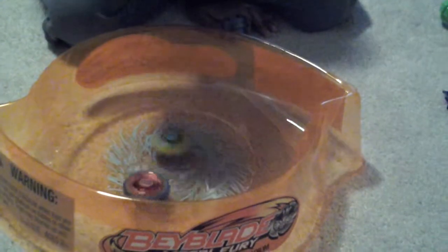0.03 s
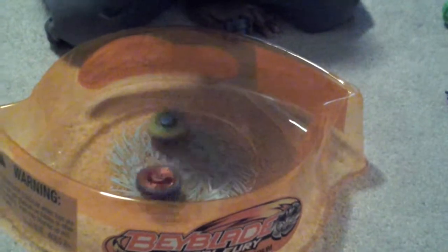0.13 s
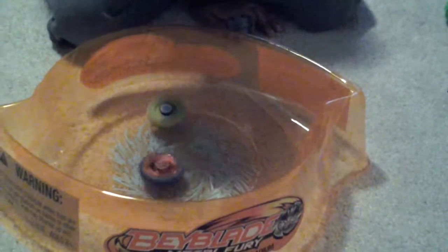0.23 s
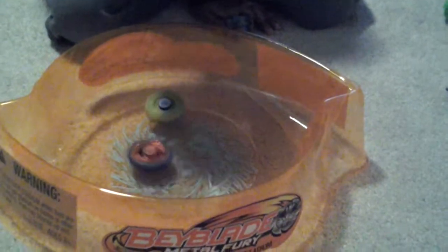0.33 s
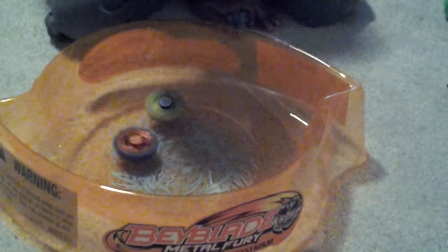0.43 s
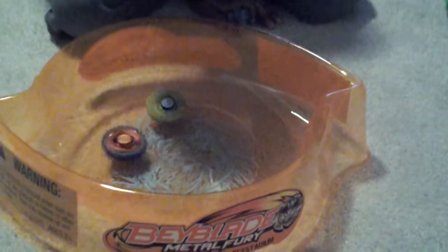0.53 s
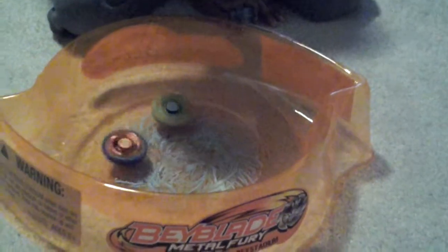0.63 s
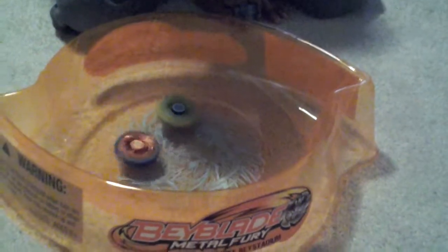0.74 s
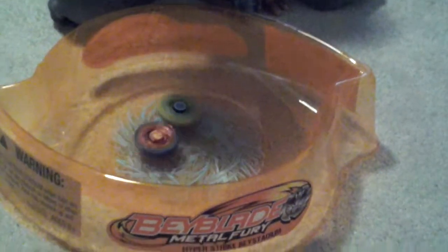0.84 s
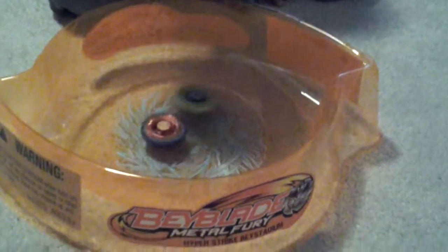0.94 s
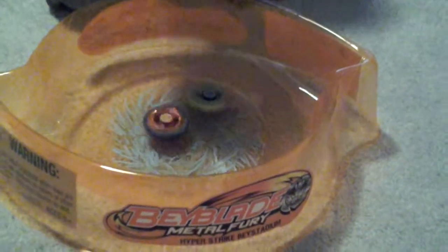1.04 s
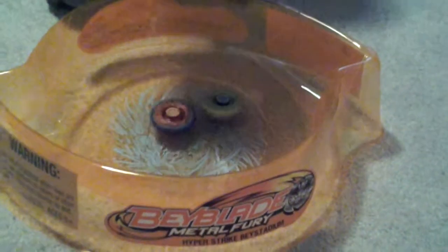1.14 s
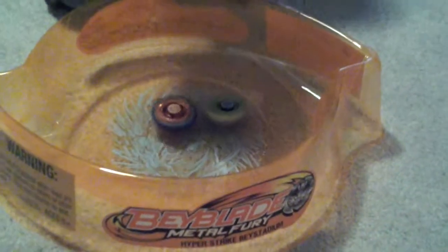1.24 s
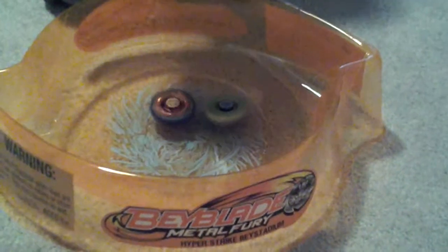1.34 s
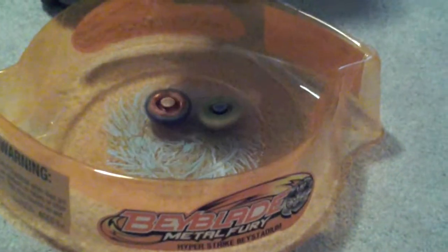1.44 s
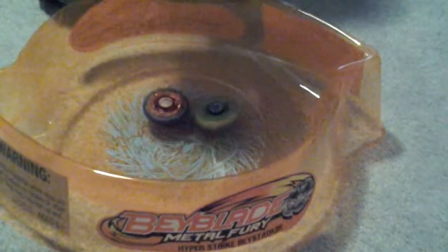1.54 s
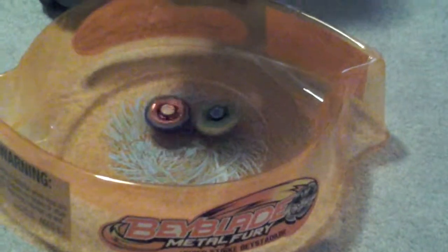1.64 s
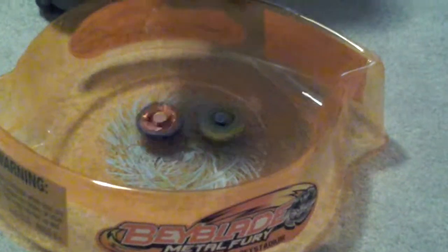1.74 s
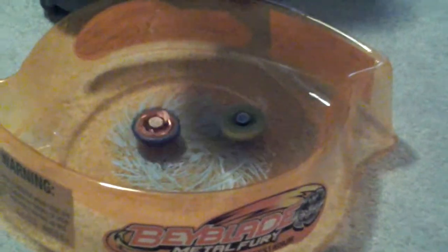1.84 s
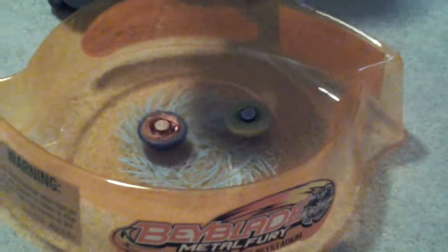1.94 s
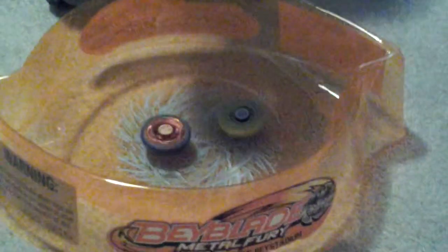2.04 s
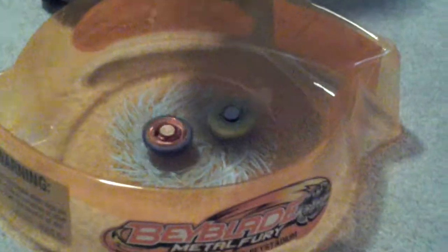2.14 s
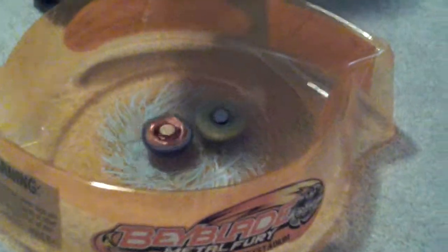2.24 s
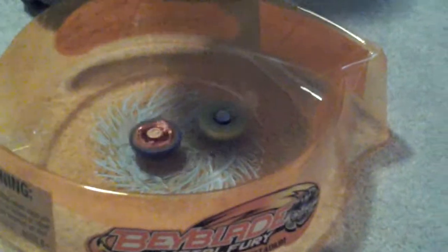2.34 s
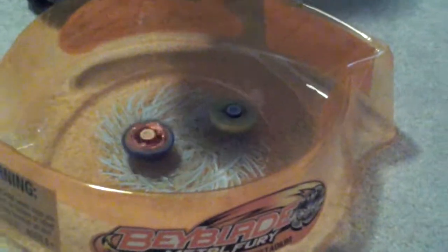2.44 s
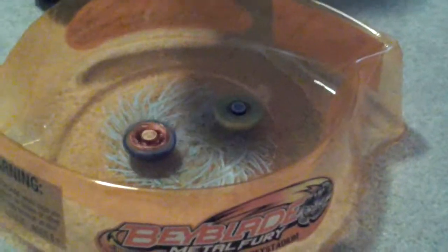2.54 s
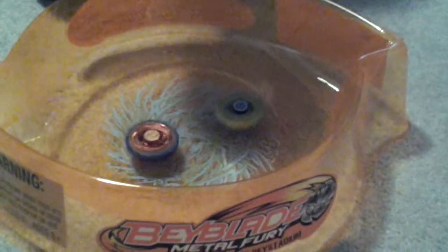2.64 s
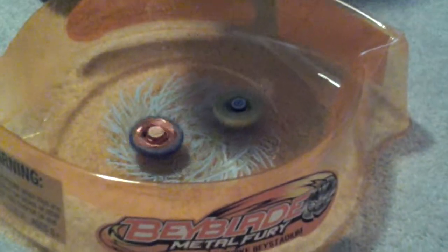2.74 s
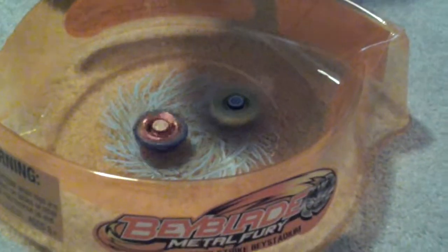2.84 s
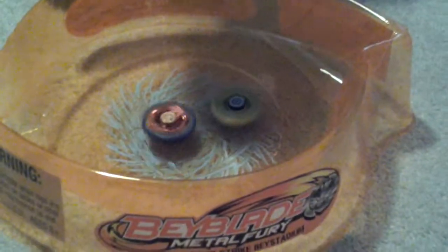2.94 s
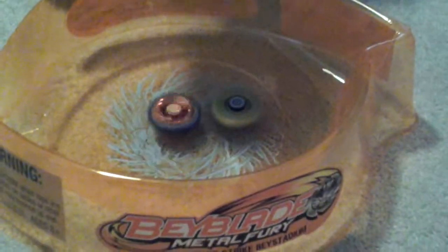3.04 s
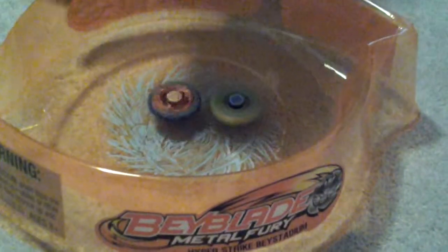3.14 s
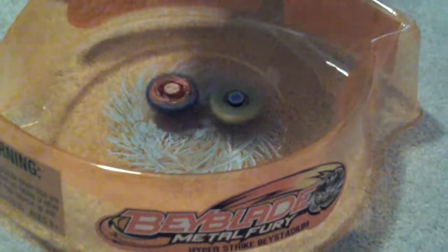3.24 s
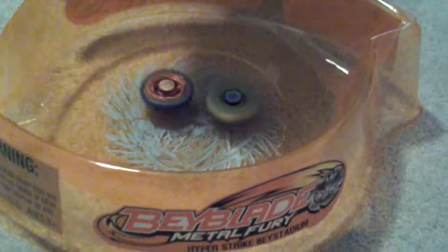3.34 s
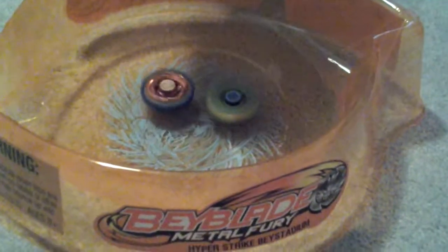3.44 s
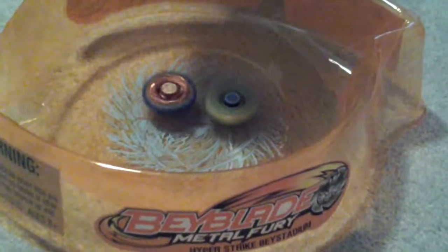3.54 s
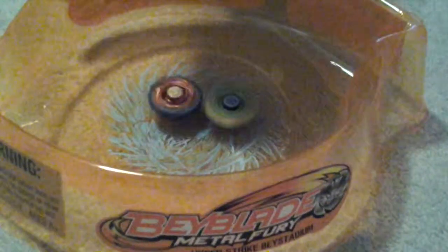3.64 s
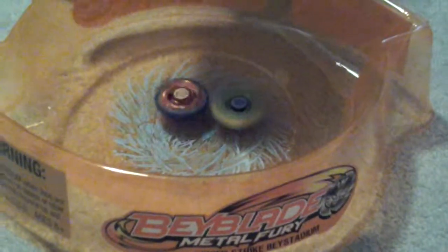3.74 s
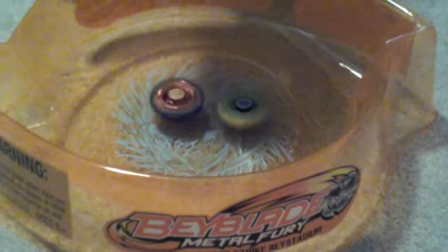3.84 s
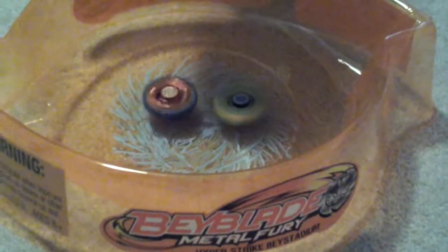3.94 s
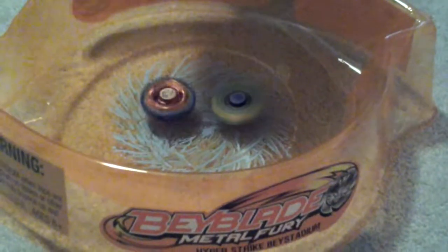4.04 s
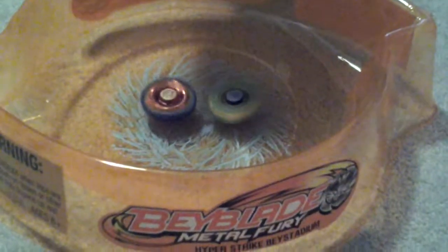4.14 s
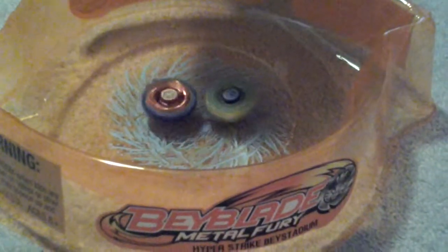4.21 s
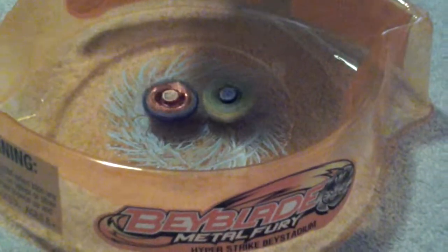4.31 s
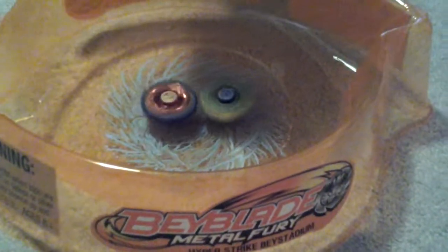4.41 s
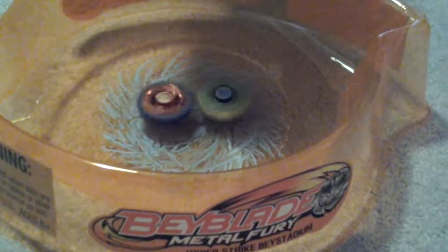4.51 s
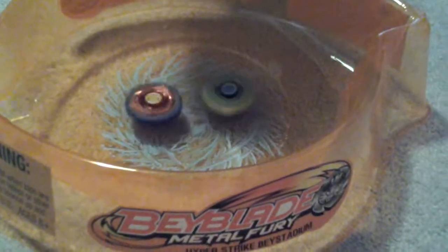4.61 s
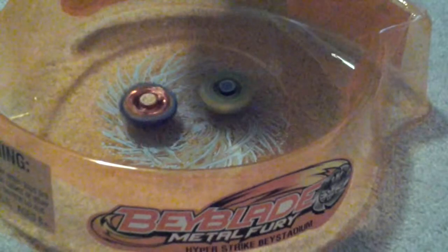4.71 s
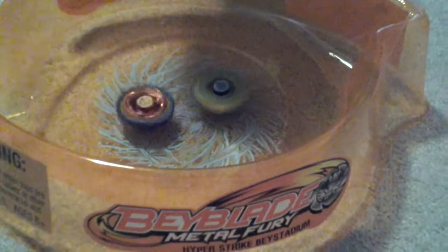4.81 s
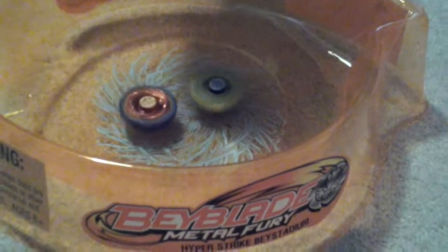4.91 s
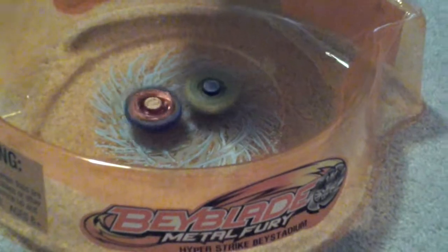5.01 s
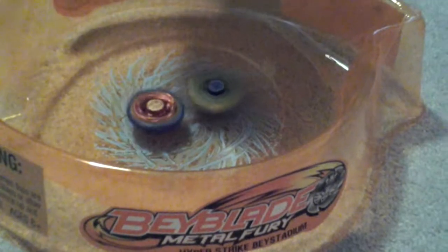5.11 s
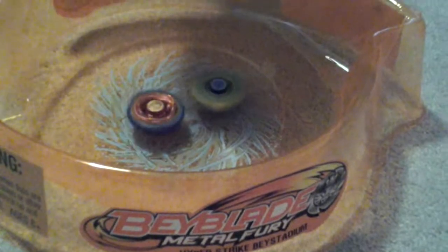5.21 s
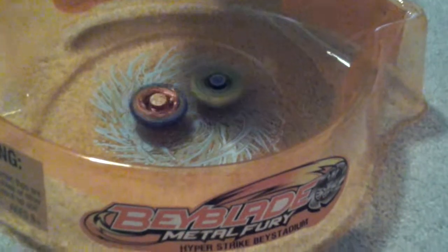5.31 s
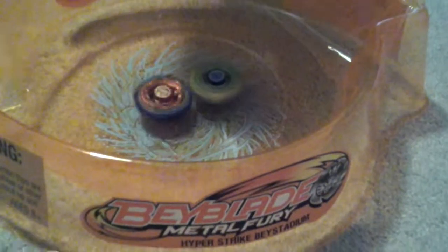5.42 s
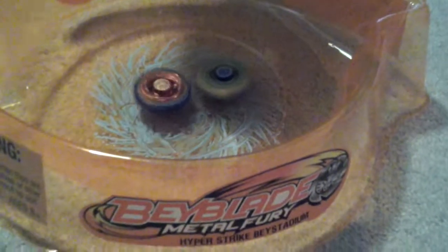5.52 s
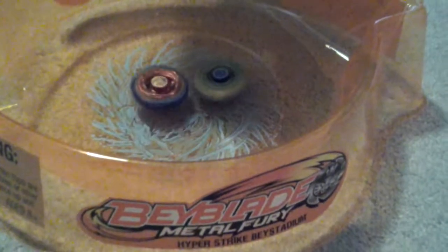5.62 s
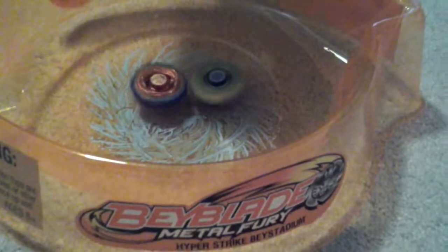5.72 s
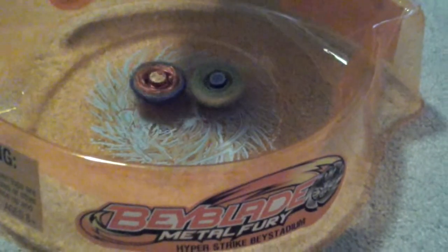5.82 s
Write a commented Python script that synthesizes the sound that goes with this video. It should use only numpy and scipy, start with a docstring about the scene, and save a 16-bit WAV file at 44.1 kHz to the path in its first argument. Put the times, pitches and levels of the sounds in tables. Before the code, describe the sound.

A rapid fluttering metallic scrape slows over a soft rumble and hiss in plastic, broken by sudden loud metal clashes in a small room.

```python
"""Two metal spinning tops circle in a plastic bowl in a small room.
From the start a rocking top scrapes twice a sway, ever slower, in swells of shaped friction noise, while
the tips rumble, grind and hiss as filtered noise over room noise and a faint hum of wavering tones.
From 0.9 s the rims clash now and then: a short noisy clack, then a ring of damped modes, answered by the room.
The loud clashes overload the microphone: its limiter ducks. After 4.96 s the scrapes cease; clashes go on."""
import sys
import numpy as np
from scipy import signal
from scipy.fft import irfft, next_fast_len
from scipy.io import wavfile

SR = 44100
rng = np.random.default_rng(int(sys.argv[2]) if len(sys.argv) > 2 else 0)


def wrap_up_sound(samples):
    """Save the sound to the file named by the first command line argument, as 16-bit audio."""
    columns = np.atleast_2d(samples).T
    # keep every value between -1 and 1, then stretch to whole-number steps
    tamed = np.clip(columns, -1, 1)
    steps = np.round(tamed * 32767).astype(np.int16)
    wavfile.write(sys.argv[1], SR, steps)


N = 258867
TIME = np.arange(N) / SR

# Room noise spectrum: (frequency [Hz], relative level [dB])
AIR_SPECTRUM = [(25, -38.5), (55, -35), (85, -20), (130, -14.5), (230, -2), (500, 0.5), (2000, -4.5),
                (3200, -6.5), (5000, -6), (6500, -16), (9000, -17), (14500, -23)]
# Lines of a faint hum: (frequency [Hz], width [Hz], level at the start [dB], drift [dB/s])
HUM_LINES = [(121, 1.6, -76.5, 0), (173, 5.5, -73.5, 0), (224, 12.3, -65.5, 0), (357.6, 2.5, -53, -0.79),
             (647.6, 6.7, -61.5, .5), (722, 7.8, -62.5, 1), (736.4, 5.4, -55, 0.58),
             (830, 9.2, -55.5, -1.5), (1166, 16.4, -57.5, 0)]
# Reverberation of the room: (frequency [Hz], time to decay by 60 dB [s])
ROOM_DECAY = [(300, 1), (1500, 0.42), (4500, 0.26), (8000, 0.2), (11500, 0.19), (14000, 0.19)]

# Spectra of the bowl's rumble, of its grind and of metal scraping: (frequency [Hz], relative level [dB])
RUMBLE_SPECTRUM = [(50, -49.5), (100, -34), (220, -4), (320, 7), (450, 3), (570, 2), (700, -27), (860, 7),
                   (1000, 0), (1600, -26.5)]
GRIND_SPECTRUM = [(50, -51.5), (150, -38.5), (230, -4), (520, -6), (650, 2.5), (880, 2), (990, -5),
                  (1180, 7.5), (1500, 3.5), (1950, 0), (2700, -7.5), (4000, -38)]
SCRAPE_SPECTRUM = [(80, -50), (1000, -13.5), (2800, -14.5), (3600, -6.5), (4100, 2), (4550, -1),
                   (5050, 3.5), (5600, 0), (6250, 1), (7100, -7), (8600, -12), (10500, -25.5), (14500, -57)]
# Tips running on the bowl, fading as the tops slow:
# (level at the start in full lean [dB], fade [dB/s], dip between swells [dB])
RUMBLE_LEVEL = (-48.5, 2.5, 1.6)
GRIND_LEVEL = (-47, 0.26, 1.3)
HISS_LEVEL = (-45, 5.6, 5.8)

# Rocking top: time of its first sway [s], sway rate at the start [Hz], steady loss to friction [Hz/s]
FIRST_SWAY_S, SWAY_HZ, DRAG_HZ_PER_S = 0.0189, 28.6185, 1.273
SECOND_TOUCH = 0.46  # share of a sway between its two scrapes
# Blows that brake the rocking top: (time [s], sway rate lost [Hz])
BRAKING_BLOWS = [(0.903, 0.887), (1.758, 0.183), (4.553, 0.48)]
# Swells as the top leans over and rights itself, each lasting until the next:
# (start [s], relative level of first scrape [dB], relative level of second scrape [dB])
LEAN_SWELLS = [(-0.15, -33, -35.5), (0.45, -37.5, -36), (0.86, -35, -35), (1.251, -31, -39),
               (1.5, -36, -34), (1.8, -32.5, -36.5), (2.17, -32.5, -40), (2.4, -31.5, -36.5),
               (2.749, -31.5, -39), (3.19, -34.5, -36.5), (3.62, -39.5, -36.5), (3.99, -40.5, -38.5),
               (4.56, -40, -40)]
UPRIGHT_S = 4.958  # the last swell ends and the scrapes cease
SWELL_SKEW, SWELL_FLATNESS = 0.77, 0.87  # shape of the arch that every swell follows
FIRST_DIP_DB, SECOND_DIP_DB = 16, 4  # how far each scrape sinks between swells

# Blows of rim on rim: (time [s], relative force [dB], contact time [s], pitch of the struck spot [Hz],
# treble [dB], body knock [Hz], relative knock level [dB], relative ring level [dB], relative room level [dB])
RIM_BLOWS = [ (0.904, -14.5, 0.0014, 4310, -8, 1660, -10, -16, -6),
             (0.9064, -6, 0.0011, 7200, 1, 1700, -23, -18, -0.5),
             (1.7577, 2, 0.0006, 6120, 1, 1800, -17, 1, -1),
             (2.3392, -1.5, 0.003, 4712, 1.5, 1560, -21.5, -3.5, 0),
             (3.7373, -10.5, 0.0018, 3920, -4.5, 1260, -34, -18, -5.5),
             (3.7784, -7, 0.0023, 4100, 1.5, 2290, -28, -29, 1.5),
             (4.3265, -12, 0.0035, 6010, -3.5, 2580, -15.5, -6.5, -3),
             (4.4900, -31, 0.0016, 4200, 0, 2100, -20, -11.5, 2),
             (4.4986, -5, 0.00059, 4500, -7.5, 2170, -28, -11, -5),
             (4.5536, -0.5, 0.00063, 5303, 2.5, 3435, -7.5, -17.5, -4.5),
             (5.111, -6.5, 0.00097, 5540, -6.5, 2500, -13, -3.5, -3),
             (5.4608, -6, 0.0014, 4950, -7, 1790, -27, 5.5, 0.5),
             (5.8412, -9, 0.0017, 3860, -3.5, 2520, -13.5, 0.5, -5)]
# Spectrum of rims chattering on each other: (frequency [Hz], relative level [dB])
CLACK_SPECTRUM = [(200, -41), (700, -17.5), (1500, -14), (2700, -13), (3700, -4), (5000, 2), (6500, -6.5),
                  (7400, -3.5), (9000, -9), (10300, -12.5), (11800, -7), (14500, -25)]
# Modes of the metal wheels: (frequency [Hz], relative level [dB], time to decay by 60 dB [s])
WHEEL_MODES = [(4510, 1.5, 0.2), (4546, 2.5, 0.22), (4600, -7, 0.1), (5090, -13.5, 0.13), (5860, -22, 0.14),
               (9050, -29, .14), (10500, -25, .1), (11520, -17, 0.11), (11700, -12.5, .2),
               (13400, -23.5, .1)]

EDGE_HZ = 14900  # upper band limit


def amp(db):
    """Level as amplitude: a gain is ten to the power of decibels over twenty."""
    return 10 ** (np.asarray(db) / 20)


def unit(x):
    """Normalization: equal mean power, here an rms of 1."""
    return x / np.sqrt(np.mean(x ** 2) + 1e-20)


def read(points, hz):
    """Interpolation of a tabled curve along a logarithmic frequency axis."""
    f, value = np.transpose(points)
    return np.interp(np.log(hz + 1), np.log(f), value)


def add(mix, s, sound):
    """Superposition: a sound is summed into the mix from time s."""
    part = mix[max(0, round(s * SR)):][:len(sound)]
    part += sound[:len(part)]


def noise(db_at, size=N):
    """Spectral synthesis: random phases under the magnitudes db_at(Hz) give noise of rms 1."""
    length = next_fast_len(size, True)
    hz = np.fft.rfftfreq(length, 1 / SR)
    phases = np.exp(2j * np.pi * rng.random(len(hz)))
    wave = irfft(amp(db_at(hz)) * phases, length)
    return unit(wave[:size])


def coloured(points, size=N):
    """Coloured noise: random phases under a tabled spectrum, at rms 1."""
    return noise(lambda hz: read(points, hz), size)


def waver(rate_hz, size=N):
    """Low-passed random fluctuation: a slow signal of rms 1, weak above rate_hz."""
    return noise(lambda hz: -10 * np.log10(1 + (hz / rate_hz) ** 4), size)


def room(x, build_s=0.0026, echo_s=0.017, echo=0.096):
    """Reverberation: convolution with a diffuse tail, mostly shorter in the treble, and one early echo."""
    hz, t, z = signal.stft(rng.standard_normal(SR // 2), SR, nperseg=256)
    decay_db = -60 * t / read(ROOM_DECAY, hz)[:, None]
    tail = signal.istft(z * amp(decay_db), SR)[1]
    tail *= 1 - np.exp(-np.arange(len(tail)) / SR / build_s)
    tail /= np.linalg.norm(tail)
    tail[round(echo_s * SR)] += echo
    return signal.fftconvolve(x, tail)


def background(air_db=-51, flutter_db=3.5):
    """Narrow-band modulation: hum lines waver in pitch and level, some drifting, over steady room noise."""
    out = amp(air_db) * coloured(AIR_SPECTRUM)
    for hz, width_hz, db, drift_db in HUM_LINES:
        turns = np.cumsum(hz + width_hz / 2 * waver(width_hz)) / SR
        line = unit(amp(flutter_db * waver(6.6)) * np.sin(2 * np.pi * turns))
        out += amp(db + drift_db * TIME) * line
    return out


def lean(s):
    """Slow tilting: which swell is under way at times s, and how far the top leans in it, 0-1."""
    edges = [row[0] for row in LEAN_SWELLS] + [UPRIGHT_S]
    place = np.interp(s, edges, np.arange(len(edges)))
    arch = np.abs(np.sin(np.pi * (place % 1) ** SWELL_SKEW)) ** SWELL_FLATNESS
    return np.minimum(place.astype(int), len(LEAN_SWELLS) - 1), arch


def tips(hiss_grain_db=2):
    """Sliding friction: the bowl rumbles and grinds, the contact hisses; all follow lean and fade with spin."""
    arch = lean(TIME)[1]

    def level_db(start_db, fade_db, dip_db):
        """Frictional decay: the level falls steadily with time and dips between swells."""
        return start_db - fade_db * TIME - dip_db * (1 - arch)

    rumble = amp(level_db(*RUMBLE_LEVEL)) * coloured(RUMBLE_SPECTRUM)
    grind = amp(level_db(*GRIND_LEVEL)) * coloured(GRIND_SPECTRUM)
    hiss_db = level_db(*HISS_LEVEL) + hiss_grain_db * waver(130)
    hiss = amp(hiss_db) * coloured(SCRAPE_SPECTRUM)
    return rumble + grind + hiss


def sway_count():
    """Rotational drag: the sway rate sinks steadily and drops a step at each braking blow; its sum counts sways."""
    lost_to_blows_hz = sum(lost_hz * (TIME > s) for s, lost_hz in BRAKING_BLOWS)
    rate_hz = SWAY_HZ - DRAG_HZ_PER_S * TIME - lost_to_blows_hz
    sways = np.cumsum(rate_hz) / SR
    return sways - np.interp(FIRST_SWAY_S, TIME, sways)


def rocking(level_db=-1, length_s=0.006, chatter_db=3, uneven_db=0.05, room_db=-8):
    """Intermittent friction: the top chatters briefly twice in each sway, harder the more it leans."""
    sways = sway_count()
    _, first_db, second_db = np.transpose(LEAN_SWELLS)
    friction = amp(chatter_db * waver(530)) * coloured(SCRAPE_SPECTRUM)
    dry = np.zeros(N)
    touches = ((0, first_db, FIRST_DIP_DB), (SECOND_TOUCH, second_db, SECOND_DIP_DB))
    for share, top_db, dip_db in touches:
        times = np.interp(np.arange(int(sways[-1])) + share, sways, TIME)
        chance = rng.standard_normal((len(times), 2))
        for at, swell, arch, (level_chance, length_chance) in zip(times, *lean(times), chance):
            if at < UPRIGHT_S:
                length = length_s * np.exp(0.21 * length_chance)
                touch = signal.windows.tukey(round(length * SR), 0.8)
                scrape = unit(touch * friction[round(at * SR):][:len(touch)])
                scrape_db = level_db + top_db[swell] - dip_db * (1 - arch) + uneven_db * level_chance
                add(dry, at - length / 2, amp(scrape_db) * scrape)
    return dry + amp(room_db) * room(dry)[:N]


def treble_share(hz):
    """Spectral tilt: how much of a blow's brightness a frequency gets, 0-1."""
    return np.clip((hz - 5000) / 5000, 0, 1)


def clack(t, contact_s, treble_db, tones, rise_s=0.00045, fade_s=0.0021):
    """Impact excitation: rims chatter while they touch; tones (Hz, dB) die with them in a few milliseconds."""
    blow = noise(lambda hz: read(CLACK_SPECTRUM, hz) + treble_db * treble_share(hz), len(t))
    for hz, db in tones:
        blow = blow + amp(db) * np.sqrt(2) * np.sin(2 * np.pi * (hz * t + rng.random()))
    fade = np.exp(-np.maximum(t - contact_s, 0) / fade_s)
    envelope = (1 - np.exp(-t / rise_s)) * fade
    return unit(blow * envelope) * np.sqrt(np.mean(envelope ** 2))


def ring(t, treble_db, spread_db=1, rise_s=0.0022, flutter_db=4.5, flutter_hz=110):
    """Modal decay: bright blows stir the high modes most; the ring flutters as spinning rims sweep it around."""
    chance = rng.standard_normal((len(WHEEL_MODES), 2))
    modes = np.zeros(len(t))
    for (hz, db, t60), (level_chance, phase) in zip(WHEEL_MODES, chance):
        gain = amp(db + treble_db * treble_share(hz) + spread_db * level_chance)
        decay = np.exp(-np.log(1000) * t / t60)
        modes += gain * decay * np.sin(2 * np.pi * (hz * t + phase))
    flutter = unit(amp(flutter_db * waver(flutter_hz, len(t))))
    return modes * (1 - np.exp(-t / rise_s)) * flutter


def clashes(spot_db=-3, ring_db=-15, clack_room_db=-5, ring_room_db=-8, count=3):
    """Collision: each blow gives a clack and a metal ring, both answered by the room."""
    out = np.zeros(N)
    t = np.arange(SR // 3) / SR
    short = t[:SR // 20]
    for (s, force_db, contact_s, spot_hz, treble_db,
         knock_hz, knock_db, metal_db, wet_db) in RIM_BLOWS:
        tones = [(spot_hz, spot_db), (knock_hz, knock_db)]
        add(out, s, amp(force_db) * clack(short, contact_s, treble_db, tones))
        # the clack has another colour in every direction, so the walls return a smoother blend
        answers = [room(clack(short, contact_s, treble_db, [])) for _ in range(count)]
        walls = sum(answers) / np.sqrt(count)
        add(out, s, amp(force_db + wet_db + clack_room_db) * walls)
        metal = amp(force_db + ring_db + metal_db) * ring(t, treble_db)
        add(out, s, metal)
        add(out, s, amp(ring_room_db) * room(metal))
    return out


def scene():
    """Superposition: all sources sum at one microphone, heard alike in both channels."""
    return np.tile(clashes() + rocking() + tips() + background(), (2, 1))


def record(dry, threshold_db=-15, squeeze=0.16, attack_s=0.0066, recover_db=130, ceiling=0.74, lowest=0.83):
    """Limiting: gain ducks just after loud clashes, too late to save their fronts from clipping; then band limit."""
    power = signal.lfilter(np.ones(64) / 64, 1, dry[0] ** 2)
    power_db = 10 * np.log10(power + 1e-12)
    # the tracked level jumps up at once and falls by recover_db a second
    fall = TIME * recover_db
    tracked_db = np.maximum.accumulate(power_db + fall) - fall
    over_db = np.maximum(tracked_db - threshold_db, 0)
    r = np.exp(-1 / (attack_s * SR))
    smooth_over_db = signal.lfilter([1 - r], [1, -r], over_db)
    ducked = dry * amp(-squeeze * smooth_over_db)
    clipped = np.clip(ducked, -lowest, ceiling)  # clipping crunches the front and adds a faint thud
    low_pass = signal.firwin(255, EDGE_HZ, window=("kaiser", 8), fs=SR)
    return signal.oaconvolve(clipped, low_pass[None], "same")


dry = scene()
out = record(dry)
wrap_up_sound(out)
```